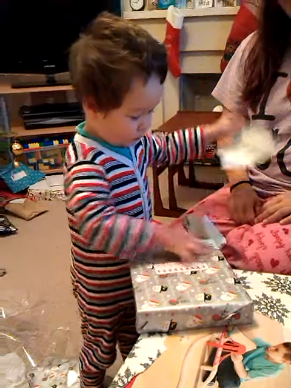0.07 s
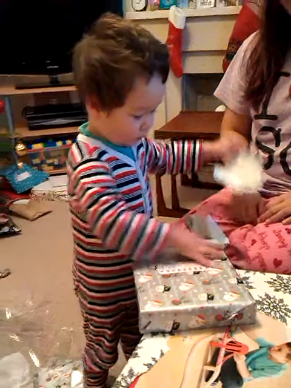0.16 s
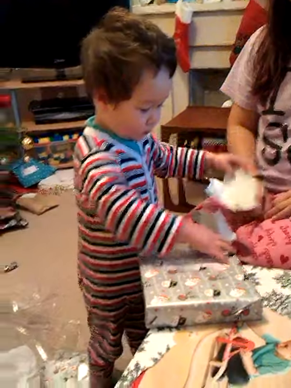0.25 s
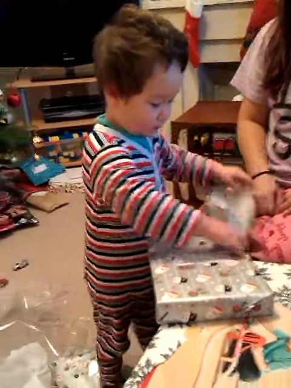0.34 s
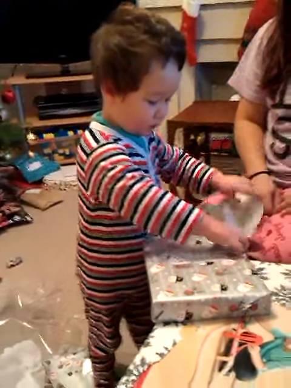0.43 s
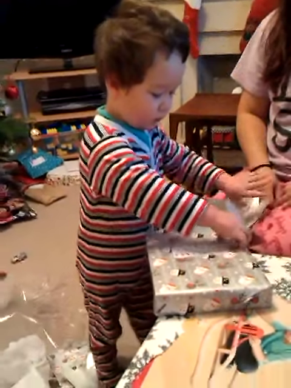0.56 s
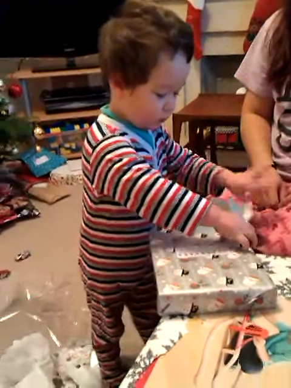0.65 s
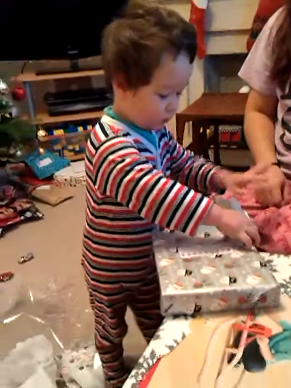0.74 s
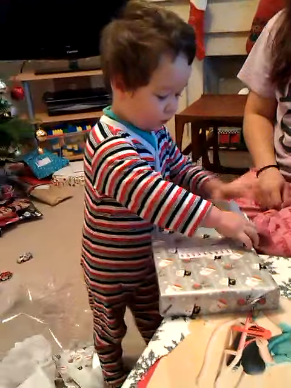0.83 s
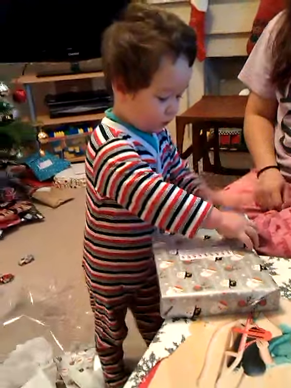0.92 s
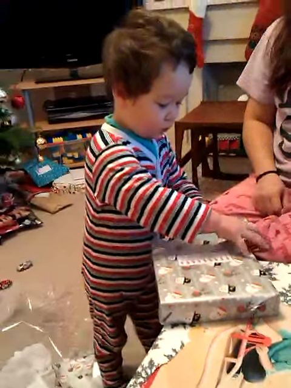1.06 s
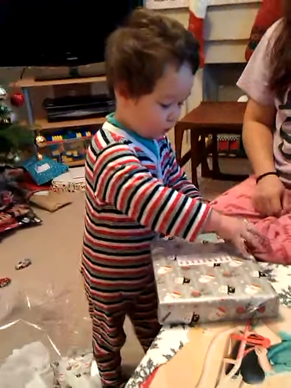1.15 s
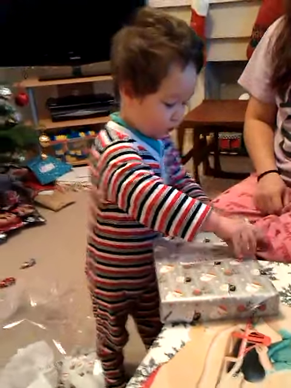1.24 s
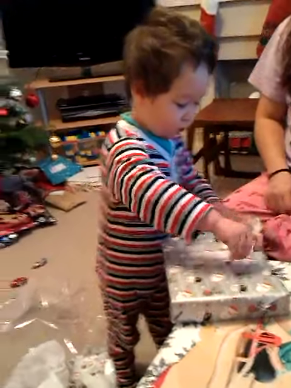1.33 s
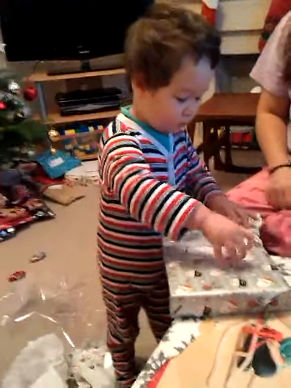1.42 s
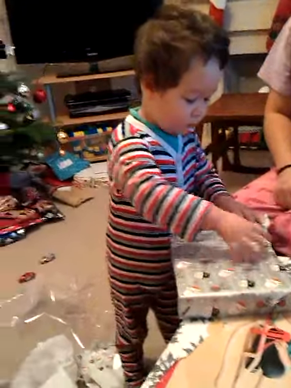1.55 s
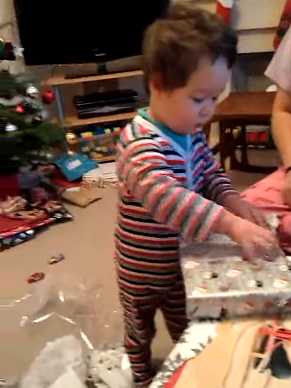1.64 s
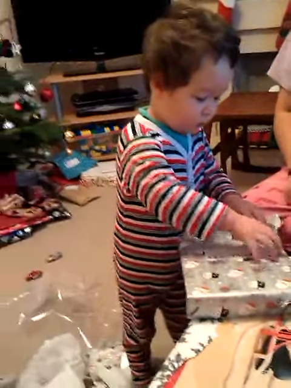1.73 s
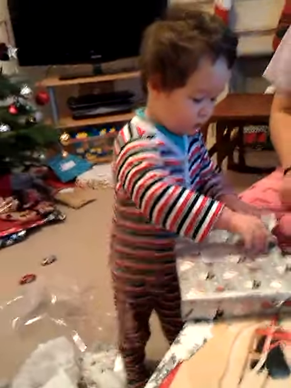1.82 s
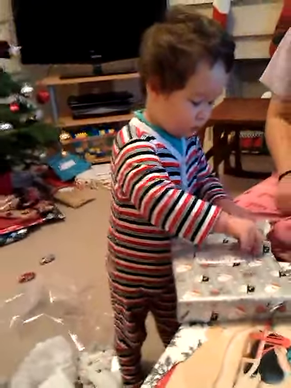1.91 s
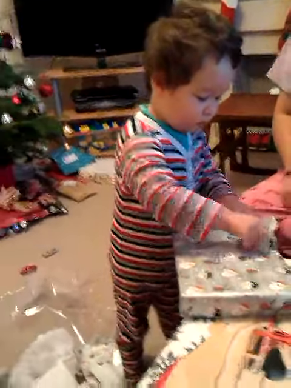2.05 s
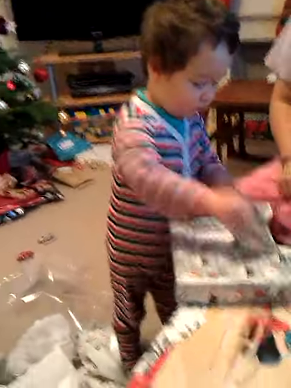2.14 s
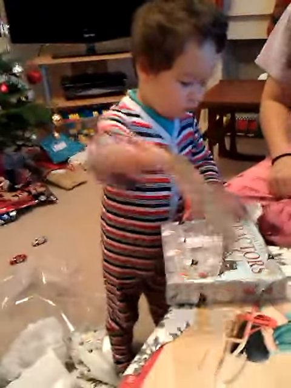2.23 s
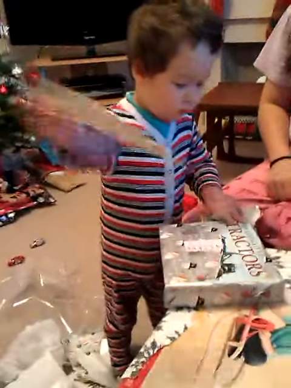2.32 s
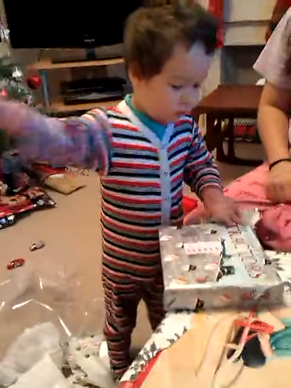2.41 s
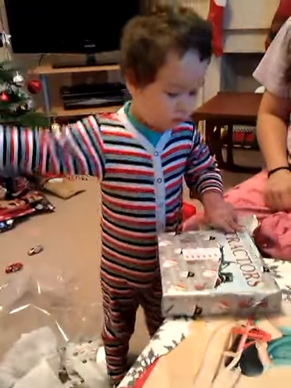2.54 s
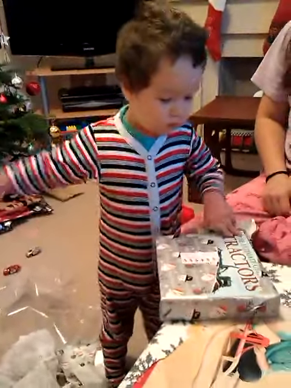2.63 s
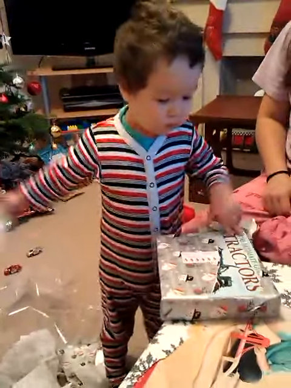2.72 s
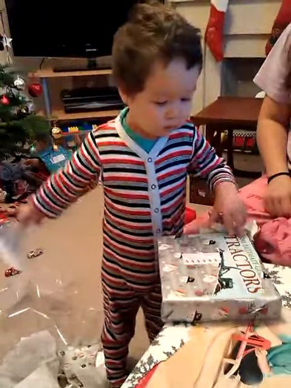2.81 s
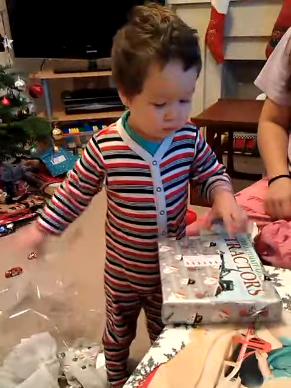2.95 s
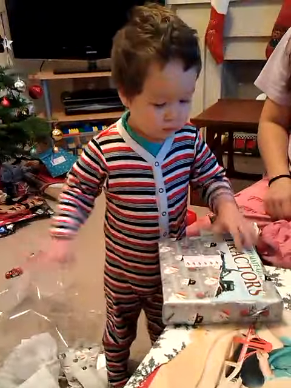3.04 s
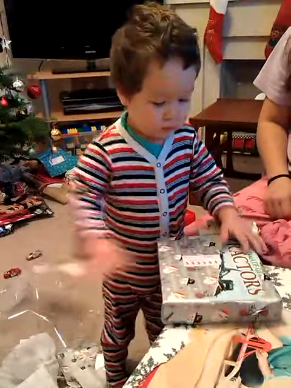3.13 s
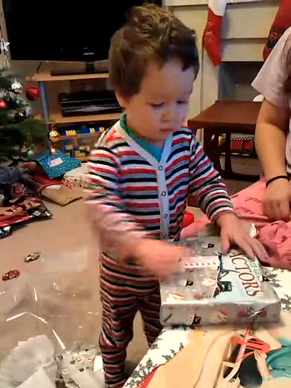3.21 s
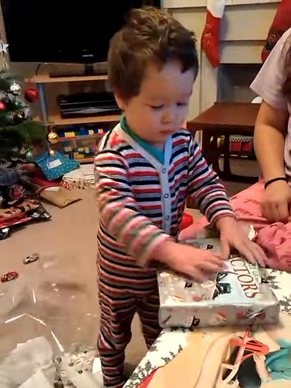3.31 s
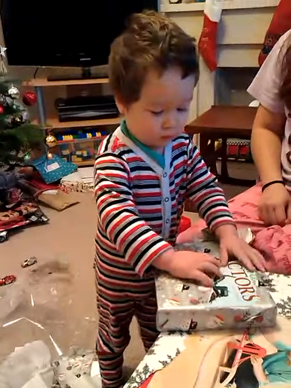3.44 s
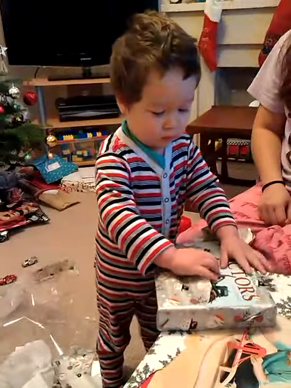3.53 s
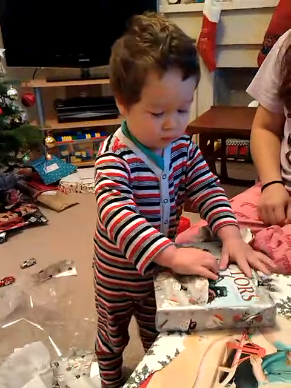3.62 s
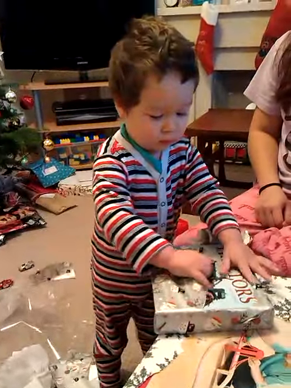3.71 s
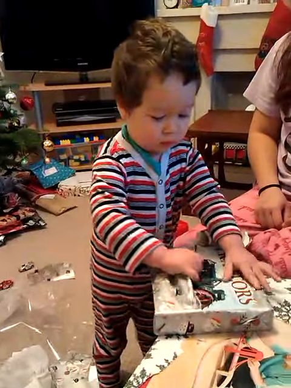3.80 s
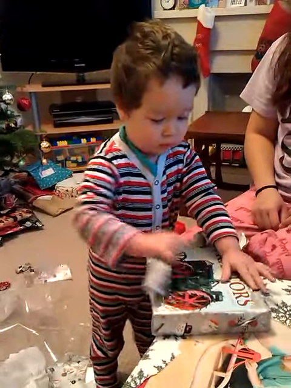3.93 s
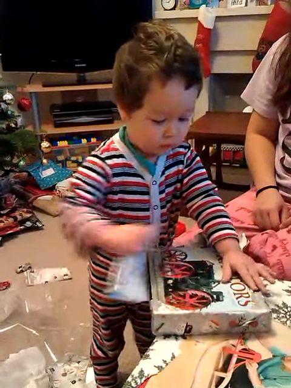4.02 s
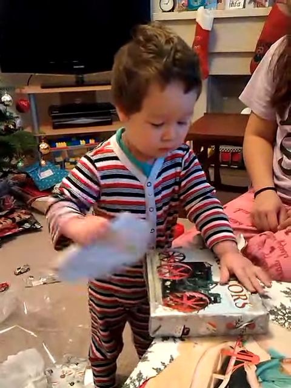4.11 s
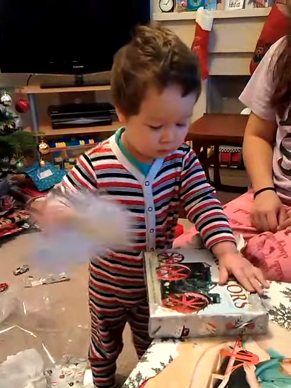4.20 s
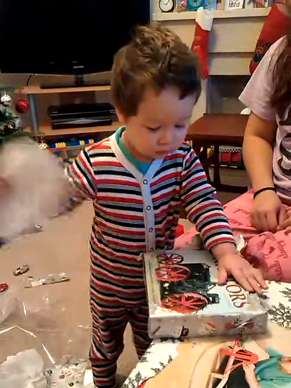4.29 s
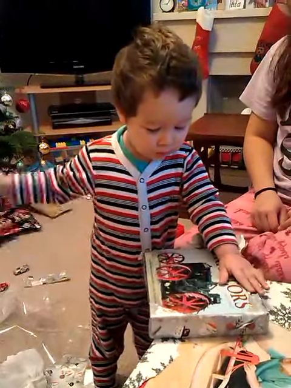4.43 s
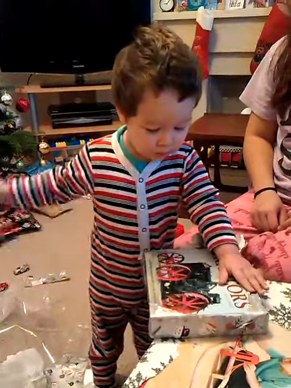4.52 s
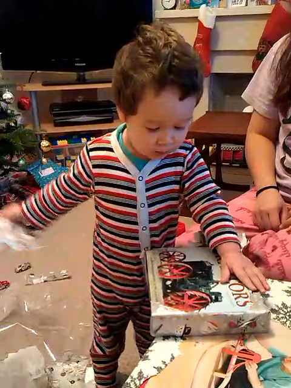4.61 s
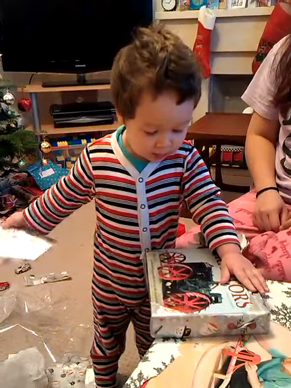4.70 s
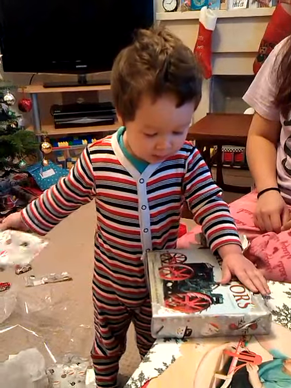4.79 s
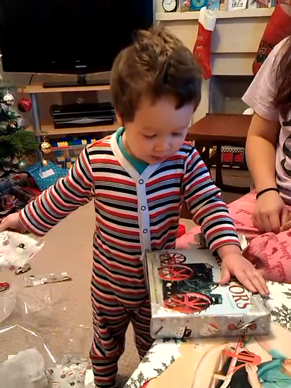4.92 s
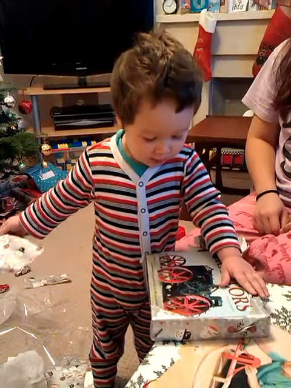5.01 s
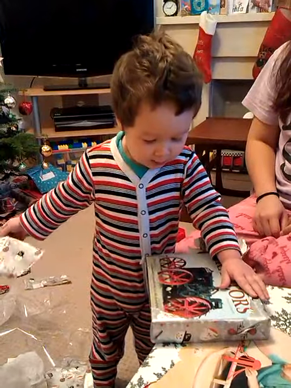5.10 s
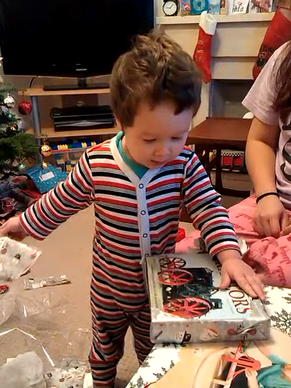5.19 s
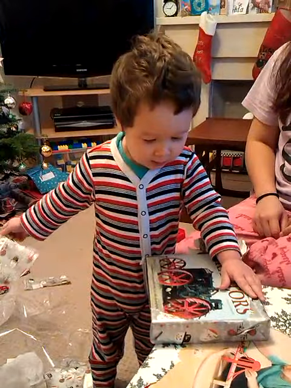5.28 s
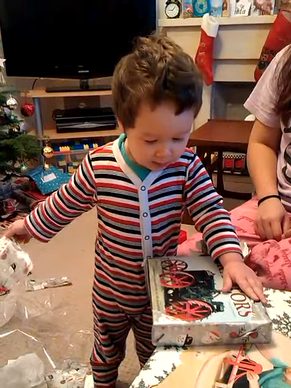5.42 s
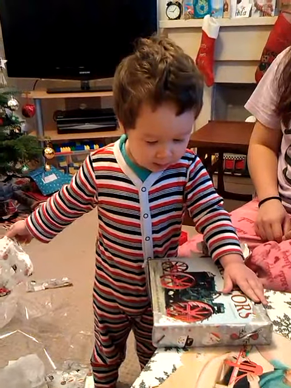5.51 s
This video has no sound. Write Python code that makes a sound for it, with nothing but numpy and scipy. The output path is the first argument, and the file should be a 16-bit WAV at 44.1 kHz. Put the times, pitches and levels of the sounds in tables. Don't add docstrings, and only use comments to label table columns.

```python
import sys
import numpy as np
from scipy import signal
from scipy.fft import rfft, irfft, next_fast_len
from scipy.io import wavfile
from scipy.ndimage import uniform_filter1d, map_coordinates

SR = 44100
rng = np.random.default_rng(int(sys.argv[2]) if len(sys.argv) > 2 else 0)


def transcribe(signal):
    frames = np.atleast_2d(signal).T
    limited = np.clip(frames, -1, 1)
    pcm = np.round(limited * 32767).astype(np.int16)
    wavfile.write(sys.argv[1], SR, pcm)


def invert_db(level):
    return 10 ** (np.asarray(level, dtype=float) / 20)


N = 244799

# t/s, level/dB
CONTACT = [(0, -68.5), (1.0, -67.5), (2.0, -62.5), (2.5, -67), (3.0, -70), (3.6, -64), (4.6, -68.5),
           (4.95, -72.5), (5.55, -74)]
# t/s, peak level/dB, centre f/Hz, broad crack level/dB re peak
SNAPS = [(0.354, -41, 5580, -6), (0.379, -37.5, 2280, 1), (0.448, -31, 2460, 7), (0.666, -30.5, 1880, -14),
         (0.675, -35.5, 2020, -39), (0.678, -46, 1840, -43.5), (0.686, -49, 2100, -30),
         (0.92, -44, 4900, -13), (0.925, -42, 4800, -18), (0.761, -36, 3840, -12), (0.775, -27, 4440, -6),
         (0.917, -37, 5160, -16), (0.932, -30.5, 5470, -13), (0.986, -50, 5360, 5), (0.994, -36, 5600, 5),
         (1.002, -24.5, 4430, -2), (1.755, -22.5, 6030, -26), (1.832, -37.5, 5260, -16),
         (1.88, -42.5, 1320, -5), (1.947, -22, 5450, -11.5), (2.888, -42, 3070, 7), (3.692, -15, 6340, 6),
         (4.479, -56, 1664, -7), (4.62, -38, 2990, -10), (4.621, -34, 6300, -23), (0.482, -45, 2500, 4),
         (1.917, -40, 5500, -10), (4.628, -34, 3000, -3), (4.678, -32.5, 2500, -2), (4.678, -38, 5130, -6),
         (4.6862, -34, 3540, -11), (4.645, -46, 2780, -3), (4.7302, -51, 2500, 4), (0.985, -36, 5490, -12),
         (4.829, -43, 1770, 1.5)]
# t/s, peak level/dB, centre f/Hz, broad crack level/dB, low knock level/dB re peak
TAPS = [(0.09, -29.5, 4300, -0.5, -3.5), (0.208, -30.5, 925, 5, -9), (0.586, -38, 2800, -9, 5.5),
        (0.851, -42, 1920, 9, 1), (1.047, -28, 5600, 4, 0), (1.073, -38, 5440, 0, 4),
        (1.485, -38, 1310, 5, 2), (1.583, -27.5, 4100, 4, -7), (2.572, -50, 1090, 5, 15),
        (2.818, -44, 897, -22, 8.5), (3.484, -44, 830, -3, 10), (4.467, -33.5, 2470, -6.5, -10)]


def unit(x):
    return x / np.sqrt(np.mean(x ** 2) + 1e-20)


def along(points, hz):
    f, v = np.transpose(points)
    return np.interp(np.log(hz + 1), np.log(f + 1), v)


def curve(rows):
    s, *cols = np.transpose(rows)
    return np.array([np.interp(np.arange(N) / SR, s, c) for c in cols])


def levels(spans):
    t = np.arange(N) / SR
    out = np.full((len(spans[0][0]) - 1, N), -120.)
    for rows in spans:
        s, *cols = np.transpose(rows)
        inside = (t >= s[0]) & (t <= s[-1])
        out[:, inside] = [np.interp(t[inside], s, c) for c in cols]
    return out


def swell(s, rise_s, fall_s):
    t = np.arange(N) / SR - s
    return invert_db(-20 * np.where(t < 0, -t / rise_s, t / fall_s))


def wobble(rate):
    knots = rng.standard_normal(int(N * rate / SR) + 4)
    return map_coordinates(knots, [np.arange(N) * rate / SR])


def coloured(x, spectrum):
    m = next_fast_len(len(x) + 8192)
    gain = invert_db(along(spectrum, np.fft.rfftfreq(m, 1 / SR)))
    return irfft(rfft(x, m) * gain, m)[:len(x)]


def patchy(x, depth_db):
    z = signal.stft(x, nperseg=512)[2]
    field = uniform_filter1d(rng.standard_normal(z.shape), size=6, axis=0)
    field = uniform_filter1d(field, size=11, axis=1)
    return unit(signal.istft(z * invert_db(depth_db * unit(field)), nperseg=512)[1][:N])


def grains(count, hz, spread, cycles, scatter_db):
    when, pitch = rng.random(count), rng.standard_normal(count)
    size, phase = rng.exponential(size=count), rng.random(count)
    start = (when * N).astype(int)
    centre, scatter = np.broadcast_to(hz, N)[start], np.broadcast_to(spread, N)[start]
    f = np.clip(centre * np.exp(scatter * pitch), 60, SR * .4)[:, None]
    k = np.arange(min(500, int(2.4 * SR * cycles / np.median(f)) + 8))
    life = 5 * f * k / SR / cycles
    rings = np.sin(2 * np.pi * (f * k / SR + phase[:, None])) * life * np.exp(-life)
    rings = rings * invert_db(scatter_db * np.minimum(size, 2.6))[:, None]
    rings = rings * np.sqrt(f)
    return unit(np.bincount((start[:, None] + k).ravel(), rings.ravel(), N + len(k))[:N])


def phone_floor():
    # f/Hz, level/dB per Hz
    hiss_colour = [(12, -20.5), (20, 2.5), (49, -5), (70, 0), (101, -7), (262, -15), (301, -8.5),
                   (590, -19.5), (1060, -24), (2260, -29.5), (6910, -24.5), (7950, -25), (16000, -26)]
    hiss = invert_db(-67 + 0.6 * wobble(3.4)) * unit(coloured(rng.standard_normal(N), hiss_colour))
    offset = invert_db(-43) * np.exp(-np.arange(N) / SR / .18)
    return hiss + offset


def focus_ticks():
    # t/s, peak level/dB, length/s
    steps = [
        (2.537, -70.5, 0.48),
        (4.429, -65, .03),
        (4.811, -67, 0.021),
        (4.952, -65, 0.017),
        (5.331, -64, 0.022),
        (5.356, -64, 0.014),
    ]
    out, t = np.zeros(N + SR), np.arange(SR // 2) / SR
    for s, db, length in steps:
        buzz = np.sin(2 * np.pi * 7900 * t) + 0.32 * np.sin(2 * np.pi * 5900 * t)
        buzz = buzz * (1 + np.sin(2 * np.pi * 330 * t))
        rough = invert_db(7.6 * rng.standard_normal(len(t) // 50).repeat(50))
        out[round(s * SR):][:len(t)] += invert_db(db - 8.0) * buzz * (t < length) * rough
    return out[:N]


def hand_bumps():
    # t/s, peak level/dB, f/Hz
    bumps = [
        (0.417, -29, 47.6),
        (0.604, -40.5, 45),
        (1.632, -44, 40),
        (2.389, -41, 40),
        (2.811, -46, 34.8),
        (0.971, -46, 40),
        (1.481, -36, 42.3),
    ]
    out, t = np.zeros(N + SR), np.arange(SR // 2) / SR
    for s, db, hz in bumps:
        decay = invert_db(db - 4.5 - 60 * t / .05) * (1 - np.exp(-t / 0.0015))
        out[round(s * SR):][:len(t)] -= decay * np.sin(2 * np.pi * hz * t * (2.2 - 20 * t))
    return out[:N]


def thuds():
    # t/s, peak level/dB, rise/s and fall/s per 20 dB
    shifts = [(0.0, -71, .05, 0.045), (0.22, -55, 0.047, 0.054), (0.429, -57, 0.2, 0.26),
              (0.79, -69, 0.11, .13), (1.07, -63, 0.36, 0.15), (1.28, -56.5, 0.075, 0.2),
              (1.48, -81, 0.36, .15), (1.61, -76, 0.13, 0.28), (2.4, -65, 0.19, 0.42),
              (2.81, -68.5, 0.14, 0.11), (4.09, -39.5, 0.13, 0.15), (5.36, -70, 0.11, 0.29)]
    resting = invert_db(curve(CONTACT)[0] - 5)
    moving = sum((invert_db(db) * swell(s, rise, fall)) ** 2 for s, db, rise, fall in shifts)
    weight = np.sqrt(resting ** 2 + moving)
    colour = [(20, -32.0), (60, -14.0), (100, -1), (220, -5.0), (450, -11.5), (700, -39.5)]
    return weight * invert_db(1.8 * wobble(19.0)) * unit(coloured(rng.standard_normal(N), colour))


def flaps():
    # t/s, peak level/dB, rise/s and fall/s per 20 dB
    puffs = [
        (2.15, -45, .065, 0.15),
        (3.691, -53.5, 0.014, 0.054),
    ]
    gain = sum(invert_db(db) * swell(s, rise, fall) for s, db, rise, fall in puffs)
    colour = [(80, -35.5), (150, -1), (400, -4), (700, -29)]
    return gain * unit(coloured(rng.standard_normal(N), colour))


def rustle():
    # peak t/s, peak level/dB, brightness/dB, rise/s and fall/s per 20 dB
    strokes = [(0.09, -59.5, -2, 0.38, 0.24), (0.206, -46, -14, 0.0037, 0.067),
               (0.458, -59.5, -5, 0.62, 0.91), (0.52, -69, 14.5, 0.035, 0.035),
               (0.74, -66, 15.5, 0.044, 0.025), (0.782, -55, 5, 0.1, 0.012), (1.01, -52, 1, 0.1, 0.091),
               (1.17, -61, 2, 0.13, 0.07), (1.592, -62.5, 1.5, 0.054, 0.88), (1.756, -79, 13, 0.0046, 0.51),
               (1.894, -56.5, 0, 0.095, 0.17), (1.945, -53, 1, 0.0046, 0.3), (2.568, -58, -15, 0.15, 0.084),
               (2.897, -65.5, -1.5, 0.45, 0.12), (3.16, -73.5, 8, 0.081, 0.31),
               (3.479, -59.5, -5.5, 0.0086, 0.46), (3.594, -60, -23, 0.11, 0.021),
               (3.697, -50, 7, 0.016, 0.14), (3.819, -61, 11, 0.1, 0.017), (4.478, -64, -5, 0.19, 0.035),
               (4.623, -61.5, 9, 0.0055, 0.071), (4.682, -61, 1, 0.0071, 0.19),
               (4.834, -70, -17, 0.12, 0.2), (4.961, -73, -3, 0.025, 0.037),
               (5.342, -70.5, -3.5, 0.045, 0.087)]
    # f/Hz, level/dB per Hz
    dull_colour = [(290, -20.5), (500, -7.5), (649, -4), (779, -4.5), (1980, -5), (4000, -8.5), (5200, -23),
                   (8800, -120)]
    # f/Hz, level/dB per Hz
    bright_colour = [(1760, -32.5), (3000, -12.5), (3490, -37.5), (3960, -7), (5490, -1), (10000, -11),
                     (13000, -36.5), (22000, -120)]
    contact_db, = curve(CONTACT)
    resting = invert_db([contact_db, -70 + 2 * (contact_db + 67.0)])
    sliding = sum((invert_db([[db], [db + bright_db]]) * swell(s, rise, fall)) ** 2
                  for s, db, bright_db, rise, fall in strokes)
    dull_gain, bright_gain = uniform_filter1d(np.sqrt(resting ** 2 + sliding), size=90)
    dull_grains = grains(count=2000, hz=2184, spread=0.89, cycles=0.62, scatter_db=2.5)
    bright_grains = grains(count=5000, hz=5530, spread=0.35, cycles=3, scatter_db=2.5)
    dull = coloured(rng.standard_normal(N) + 0.03 * dull_grains, dull_colour)
    bright = coloured(rng.standard_normal(N) + .8 * bright_grains, bright_colour)
    lumps = wobble(19)
    dull = dull_gain * invert_db(0.52 * lumps) * patchy(dull, depth_db=3.0)
    return dull + bright_gain * invert_db(0.5 * lumps + 1.2 * wobble(35)) * patchy(bright, depth_db=2.0)


def scrapes():
    # t/s, peak level/dB, rise/s and fall/s per 20 dB
    drags = [
        (0.0, -55.5, .01, 0.37),
        (0.209, -46, 0.0074, 0.049),
        (1.69, -62, 0.45, 0.096),
        (4.55, -70.5, 0.41, 0.1),
    ]
    # f/Hz, level/dB per Hz
    hollow = [(480, -56), (720, 6.5), (860, 5.5), (1080, -13), (1430, 5), (1900, -29), (2700, -7.5),
              (3400, -44)]
    gain = sum(invert_db(db) * swell(s, rise, fall) for s, db, rise, fall in drags)
    return gain * invert_db(3.5 * wobble(30)) * unit(coloured(rng.standard_normal(N), hollow))


def crinkles():
    # peak t/s, peak level/dB, f/Hz, rise/s and fall/s per 20 dB
    swarms = [
        (.395, -56, 2480, 0.063, 0.04),
        (.682, -53.5, 1980, 0.014, 0.12),
        (.745, -61, 2150, 0.049, 0.064),
        (.805, -61, 2960, 0.085, 0.079),
        (1.885, -56, 1600, 0.067, 0.13),
        (3.705, -44, 2400, 0.018, 0.085),
        (3.77, -54.5, 2320, .05, .05),
        (4.55, -67, 1910, .2, 0.11),
        (4.645, -56.5, 2100, 0.055, .06),
        (4.7, -59.5, 2550, .03, 0.091),
    ]
    pitch_hz, = curve([row[:3:2] for row in swarms])
    gain = sum(invert_db(db) * swell(s, rise, fall) for s, db, hz, rise, fall in swarms)
    return gain * grains(count=5000, hz=pitch_hz, spread=.15, cycles=6, scatter_db=3.5)


def tape():
    # t/s, peak level/dB
    ticks = [
        (0.448, -56),
        (0.52, -41),
        (1.948, -28.5),
        (3.693, -22),
        (3.704, -40),
        (4.002, -8.5),
        (4.245, -20),
    ]
    # f/Hz, level/dB per Hz
    tick_colour = [(6000, -16), (9000, 5), (12000, -21), (14500, -10), (16000, -10)]
    gain = sum(invert_db(db - 12.0) * swell(s, .002, 0.0025) for s, db in ticks)
    return gain * unit(coloured(rng.standard_normal(N), tick_colour))


def snaps():
    # t/s, peak level/dB, centre f/Hz, broad crack level/dB re peak
    tear_snaps = [(1.181, -39, 4800, -22), (1.182, -23, 4880, -20), (1.201, -21, 5670, -18),
                  (1.209, -23.5, 5270, -21), (1.228, -21, 6200, -12), (1.239, -22, 6000, -2),
                  (1.2641, -10, 5900, -34), (2.015, -31, 6640, -5.5), (2.0315, -23, 6400, -18.5),
                  (2.043, -17.5, 5710, -7.5), (2.0459, -24, 5970, -8), (2.056, -22.5, 7000, -9.5),
                  (2.0368, -29.5, 7000, -16), (2.073, -17, 2860, 5), (2.267, -10.5, 2300, -14.5),
                  (3.823, -20.5, 1980, -2), (3.911, -20.5, 2036, -1), (4.002, -10, 6800, 4.5),
                  (4.136, -5, 2330, 4.5), (4.152, -7, 6350, 4), (4.244, -9.5, 3000, -6),
                  (4.247, -16, 2870, -15), (3.693, -22, 2300, -18)]
    # f/Hz, level/dB per Hz
    crack_colour = [(180, -42), (300, -21.5), (555, -20), (1010, -9.5), (1190, -1), (2790, 6.5), (4440, -4),
                    (5700, 9.5), (6960, 2.5), (11000, -20.5), (16000, -32)]
    knock_colour = [(150, -18.0), (400, -9.0), (900, 6.0), (1500, -16.5)]
    out, t = np.zeros((2, N + SR)), np.arange(2048) / SR
    events = [(*row, -26.5) for row in SNAPS + tear_snaps] + TAPS
    life = t / 0.0009 * [[1], [3]]
    envelope = 3 * (1 - np.exp(-6.0 * life)) * np.exp(-.75 * life) * np.sqrt([[1], [3]])
    for s, db, hz, crack_db, knock_db in events:
        noise = rng.standard_normal((3, len(t)))
        crack = unit(coloured(noise[0], crack_colour)) * invert_db(min(crack_db, 4))
        patch_colour = [(hz * .6, -30), (hz * .82, -4), (hz, 0), (hz * 1.22, -4), (hz * 1.6, -30)]
        patch = unit(coloured(noise[1], patch_colour))
        knock = unit(coloured(noise[2], knock_colour)) * invert_db(knock_db + 1.0 - 60 * t / 0.016)
        burst = (crack + patch) * envelope
        burst = burst / np.abs(burst[0]).max() + knock * (1 - np.exp(-t / 0.0066))
        out[:, round(s * SR) + 14:][:, :len(t)] += invert_db(db - 1.5) * burst
    return out[:, :N]


def needles():
    # t/s, peak level/dB, f/Hz
    fibres = [(1.2395, -23, 5800), (1.2558, -13, 5200), (1.2644, -13, 5900), (2.1083, -9, 4300),
              (2.1535, -13, 5900), (2.1608, -13, 6200), (2.1779, -11, 4900), (2.1863, -9, 5700),
              (2.198, -8, 5600), (2.2261, -9, 5000), (2.237, -6, 5400), (2.2408, -7, 5500),
              (2.2609, -5, 5200), (2.2769, -10, 2800), (3.8358, -26, 2600), (3.8419, -25, 2800),
              (3.852, -25, 3200), (3.8609, -22, 2100), (3.8733, -22, 6700), (3.8956, -22, 8100),
              (3.9063, -21, 6800), (3.9159, -18, 3100), (3.9253, -19, 6600), (3.9535, -20, 2600),
              (3.9574, -21, 5900), (3.9652, -19, 7600), (3.9686, -18, 7200), (3.9783, -17, 5900),
              (4.0086, -14, 2500), (4.0534, -11, 6400), (4.0746, -13, 4200), (4.1109, -10, 6800),
              (4.1182, -10, 2500), (4.1578, -3, 7400), (4.164, -11, 6000), (4.1716, -12, 6500),
              (4.1766, -13, 5700), (4.1838, -15, 6500), (4.1959, -14, 7300), (4.1994, -14, 2600),
              (4.2102, -16, 7100), (4.2185, -16, 7100), (4.2308, -16, 6400), (4.2492, -13, 3100),
              (4.2586, -20, 3200)]
    out, k = np.zeros(N + SR), np.arange(128)
    for s, db, hz in fibres:
        life = 5 * hz * k / SR / 4.5
        ring = np.sin(2 * np.pi * (hz * k / SR + rng.random()))
        out[round(s * SR) - 4:][:len(k)] += invert_db(db - 1.5) * np.e * life * np.exp(-life) * ring
    return out[:N]


def slips():
    # t/s, lift level/dB, length/ms
    bursts = [(1.179, 5.5, 4), (1.1845, 6, 3), (1.213, 2, 3.7), (1.229, 13, 6.9), (1.2384, 9.5, 3.7),
              (1.266, 1.5, 3), (2.0093, 9.5, 1.8), (2.038, 7, 2.7), (2.1433, 4.5, 2.7), (2.195, 1, 5.2),
              (2.2586, 1, 1.4), (2.2687, 7.5, 2.9), (3.8019, 9, 1.4), (3.8335, 7.5, 4.3), (3.843, 9.5, 1.9),
              (3.852, 4.5, 1.8), (3.862, -0.5, 2.8), (3.873, 10, 3.5), (3.883, 2, 5.2), (3.896, 3, 5),
              (3.9059, 11.5, 4.2), (3.9094, -19, 3.5), (3.9145, 5, 6.9), (3.9535, 0, 2.3), (3.9683, 1, 2.8),
              (3.979, 10, 1.1), (4.0535, 1, 1.6), (4.064, 15.5, 1.6), (4.0725, 10, 1.3), (4.0915, 7.5, 1.4),
              (4.1115, 3, 4.1), (4.119, -1, 3.9), (4.183, 7.5, 1.9), (4.195, 13, 4.3), (4.212, 12.5, 1.7),
              (4.2183, 1, 1.8), (4.231, 4, 2), (4.249, 2, 5.5), (4.2583, 4, 2.6)]
    out, t = np.zeros(N), np.arange(-800, 800) / SR
    for s, db, ms in bursts:
        out[round(s * SR) - 800:][:len(t)] += db * np.exp(-.5 * (t / (ms / 2000)) ** 2)
    return out


def rips():
    # t/s, pull level/dB, sheet buckling level/dB, crease f/Hz (a larger flap buckles lower)
    short_rip = [(1.172, -49, -25, 2756), (1.182, -40.5, -23, 2820), (1.194, -49, -9, 2800),
                 (1.201, -26.5, -17, 2500), (1.222, -43.5, -7, 2000), (1.236, -49, -12, 1906),
                 (1.2435, -45, -10.5, 1894), (1.2465, -24.5, -4, 1913), (1.256, -22, -2, 1700),
                 (1.261, -20.5, -13.5, 1506), (1.266, -22, -14, 1500), (1.272, -53, -4, 1740)]
    # t/s, level/dB, level/dB, f/Hz
    long_rip = [
        (1.998, -54, -2.5, 1810),
        (2.068, -35, -9, 1970),
        (2.074, -27, -5, 1860),
        (2.105, -27, 3.5, 1780),
        (2.127, -28.5, -0.5, 1920),
        (2.176, -19, -8, 2670),
        (2.225, -17, -3.5, 2300),
        (2.25, -17.5, -4, 2100),
        (2.269, -22.5, 2.5, 2300),
        (2.28, -26, -0.5, 2286),
    ]
    # t/s, level/dB, level/dB, f/Hz
    last_rip = [
        (3.8, -47.5, -2, 2066),
        (3.824, -41, -2.5, 2096),
        (3.914, -32, -4.5, 2377),
        (3.969, -29.5, -5.5, 2333),
        (3.98, -28, -4, 965),
        (4.014, -23.5, -2.5, 1135),
        (4.04, -26.5, -5.5, 2680),
        (4.134, -21, 1.5, 2428),
        (4.205, -35, -3, 2392),
        (4.25, -26.5, -0.5, 2660),
    ]
    # t/s, f/Hz
    fibre_pitch = [(1.18, 5200), (1.23, 6280), (1.27, 6000), (2.03, 6210), (2.1, 5630), (2.22, 5457),
                   (2.25, 6244), (2.28, 5160), (3.87, 6770), (3.92, 6140), (3.955, 7090), (3.985, 5680),
                   (4.03, 4900), (4.07, 5750), (4.11, 7010), (4.17, 6650), (4.25, 6900)]
    # f/Hz, level/dB
    strip_colour = [(3300, -1), (4500, -0.5), (5600, -0.5), (6300, -2.5), (7000, 0), (8300, -1.5),
                    (10300, -6.5), (11300, -13)]
    scatter = [0.15, .14, 0.32]
    torn = [short_rip, long_rip, last_rip]
    crackle_db, sheet_db, crease_hz = levels(torn)
    crease_hz = np.clip(crease_hz, 900, 4500)
    kinds = zip(torn, [-9.5, -8, -11], [12400, 12800, 9100], scatter)
    spans = [[(rip[0][0], *kind), (rip[-1][0], *kind)] for rip, *kind in kinds]
    sizzle_db, sizzle_hz, fibre_spread = levels(spans)
    sizzle_hz, fibre_spread = np.clip(sizzle_hz, 8000, 15000), np.clip(fibre_spread, .05, .4)
    boom_db = -13 + 3 * np.log2(2030 / crease_hz) + 0.49 * sheet_db
    pull_db = crackle_db - 4 + slips() + 1.7 * wobble(120)
    fibres = grains(count=11000, hz=curve(fibre_pitch)[0], spread=fibre_spread, cycles=3.9, scatter_db=0.0)
    fibres = patchy(coloured(fibres, strip_colour), depth_db=2.2)
    creases = grains(count=10000, hz=crease_hz, spread=.21, cycles=4.8, scatter_db=3.0)
    creases = invert_db(sheet_db + 2.0 * wobble(60)) * patchy(creases, depth_db=2.2)
    box = grains(count=5000, hz=1000, spread=0.23, cycles=3.76, scatter_db=3.0)
    sizzle = grains(count=30000, hz=sizzle_hz, spread=0.17, cycles=14.0, scatter_db=-0.5)
    return invert_db(pull_db) * (fibres + creases + invert_db(boom_db) * box + invert_db(sizzle_db) * sizzle)


def room(x):
    # f/Hz, t60/s
    decay_times = [(150, 0.3), (600, 0.32), (2000, 0.33), (6000, 0.33), (12000, 0.27)]
    # delay t/s, level/dB
    walls = [
        (.0062, -20),
        (.0098, -17.5),
        (0.0124, -13.5),
        (.017, -26.5),
        (.024, -22.5),
    ]
    out, step = np.zeros(N + SR), SR // 10
    for start in range(0, N, step):
        hz, t, z = signal.stft(rng.standard_normal(SR // 2), SR, nperseg=256)
        decay = invert_db(-60 * t / along(decay_times, hz)[:, None])
        tail = signal.istft(z * decay, SR, nperseg=256)[1]
        tail = tail * (1 - np.exp(-np.arange(len(tail)) / SR / 0.0028))
        answer = signal.fftconvolve(x[start:start + step], tail / np.linalg.norm(tail))
        out[start:start + len(answer)] += answer
    early = sum(invert_db(db) * np.pad(x, (round(s * SR), 0))[:N] for s, db in walls)
    return early + invert_db(-4.5) * out[:N]


def scene():
    # f/Hz, level/dB
    microphone = [(30, -32), (90, -14.5), (200, -0.5), (7600, -0.5), (9200, -4.5), (11000, -8.5),
                  (15000, -12.5)]
    background = phone_floor() + focus_ticks() + hand_bumps() + thuds() + flaps()
    handling = rustle() + scrapes() + crinkles() + tape()
    torn, (snapped, spread), broken = rips(), snaps(), needles()
    paper = torn + snapped + broken + room(torn + spread + invert_db(-3) * broken)
    return (background + handling + coloured(paper, microphone))[None]


def top_cut(x):
    return signal.sosfilt(signal.butter(12, 16450, fs=SR, output="sos"), x)


def record(dry):
    # start t/s, end t/s, top f/Hz
    narrowed = [(.776, .8, 10500), (.98, 1.055, 13300), (1.92, 1.94, 11500), (1.735, 1.752, 11000),
                (2, 2.19, 15100), (2.19, 2.295, 15750), (3.69, 3.72, 15750), (3.92, 3.96, 15750),
                (3.96, 3.985, 11900), (3.77, 3.802, 15100), (3.985, 4.025, 15750), (4.152, 4.162, 15750),
                (1.235, 1.31, 13500), (2.295, 2.41, 12000), (3.72, 3.74, 13000), (3.802, 3.92, 13000),
                (4.025, 4.135, 13300), (4.135, 4.153, 11800), (4.162, 4.25, 12900), (4.25, 4.337, 11000)]
    hz, t, z = signal.stft(dry, SR, nperseg=512)
    top = np.where(wobble(14)[np.minimum(t * SR, N - 1).astype(int)] > 0, 15750, 15120)
    ragged = np.repeat(rng.standard_normal(len(t) // 4 + 1), 4)[:len(t)]
    for start, end, top_hz in narrowed:
        ragged_top = top_hz + 550 * ragged * (top_hz < 14000)
        top = np.where((t >= start) & (t < end), ragged_top, top)
    chance = rng.random((len(hz) // 5 + 1, len(t) // 4 + 1))
    chance = np.kron(chance, np.ones((5, 4)))[:len(hz), :len(t)]
    since = t[:, None] - np.array([row[0] for row in SNAPS + TAPS if row[1] > -34])
    after_click = ((since > .004) & (since < .025)).any(axis=1)
    holes = chance < np.where(after_click, .35, .05) * (hz[:, None] > 8500)
    passed = hz[:, None] < np.minimum(top, 15750)
    kept = signal.istft(z * passed * ~holes, SR, nperseg=512)[1][:, :N]
    return top_cut(kept)


dry = scene()
out = record(dry)
transcribe(out)
```